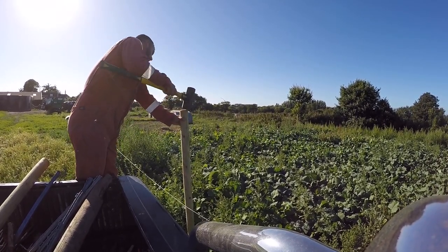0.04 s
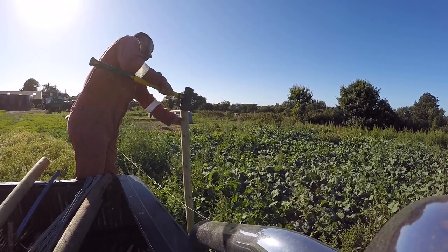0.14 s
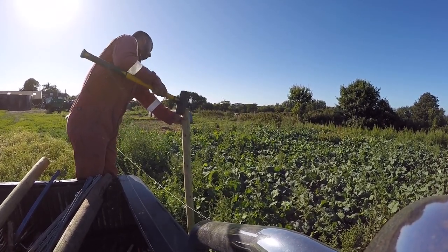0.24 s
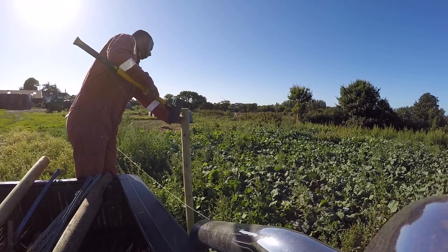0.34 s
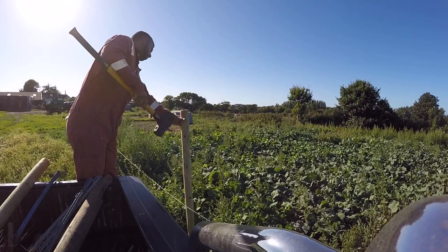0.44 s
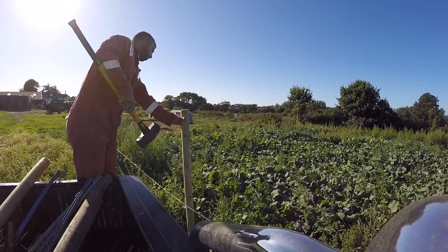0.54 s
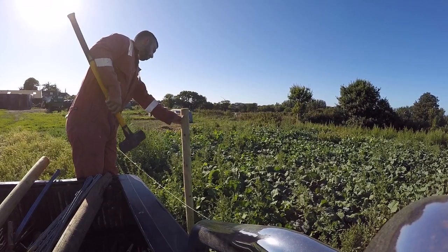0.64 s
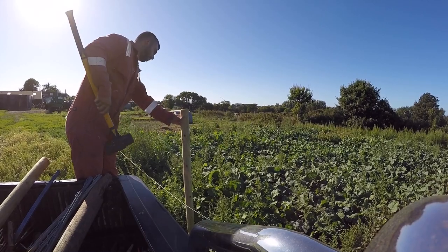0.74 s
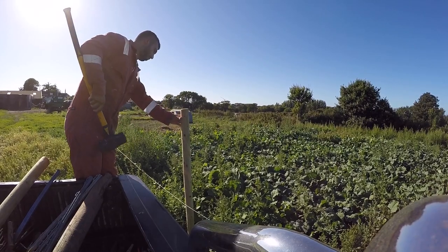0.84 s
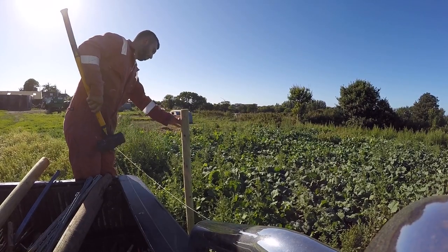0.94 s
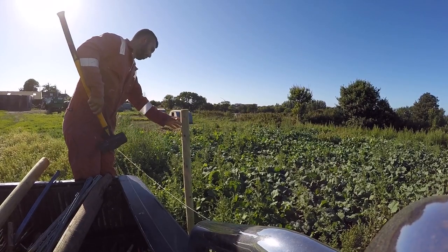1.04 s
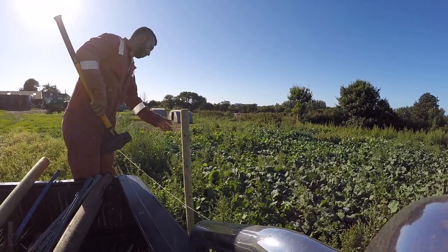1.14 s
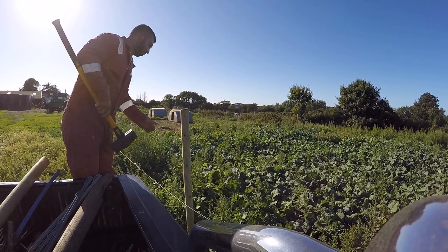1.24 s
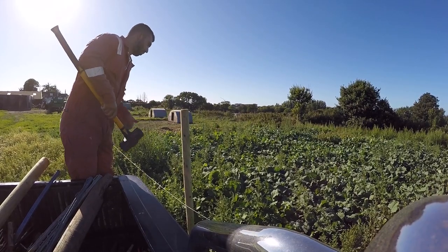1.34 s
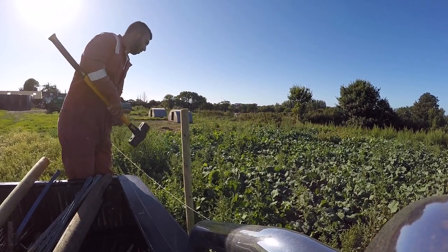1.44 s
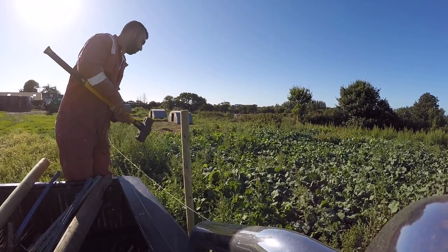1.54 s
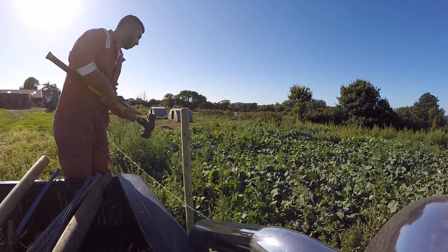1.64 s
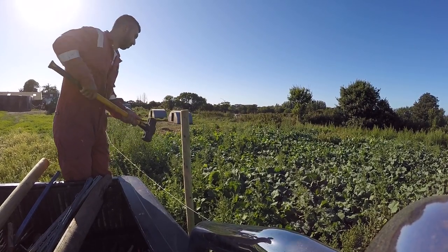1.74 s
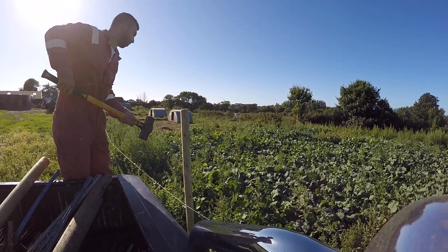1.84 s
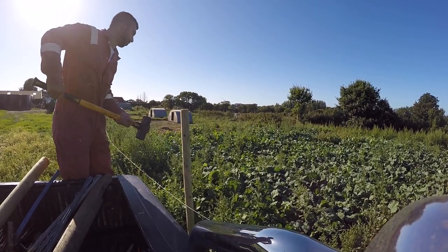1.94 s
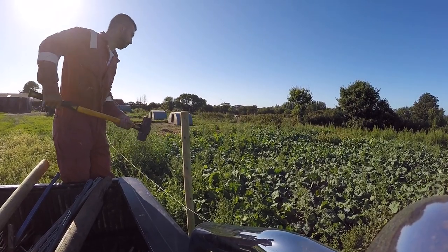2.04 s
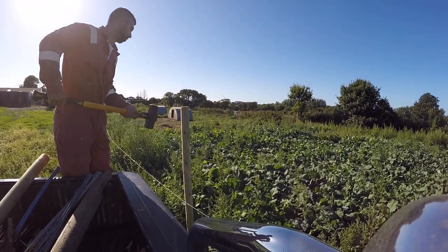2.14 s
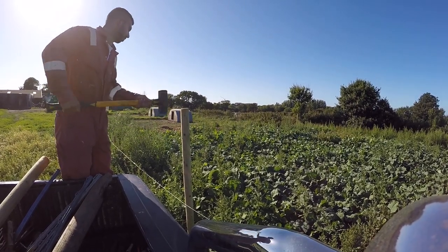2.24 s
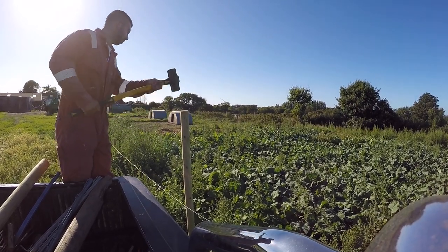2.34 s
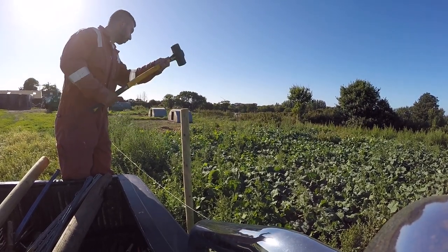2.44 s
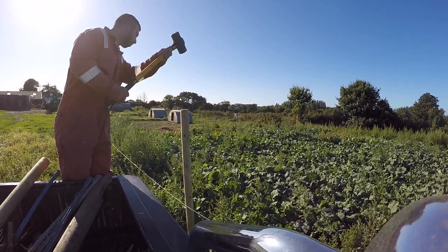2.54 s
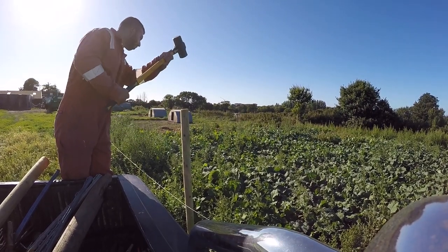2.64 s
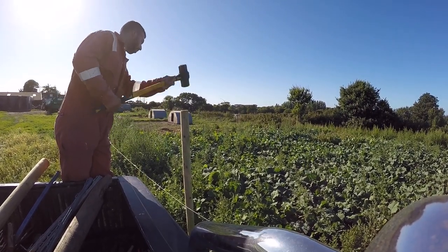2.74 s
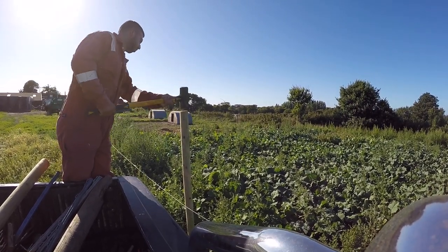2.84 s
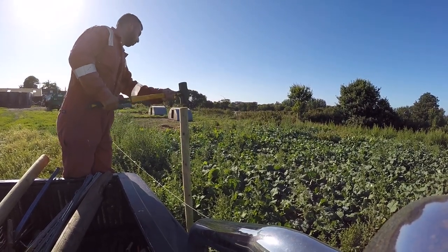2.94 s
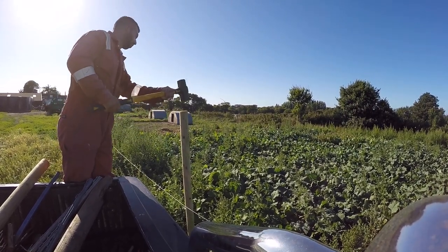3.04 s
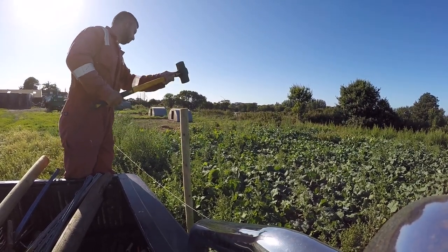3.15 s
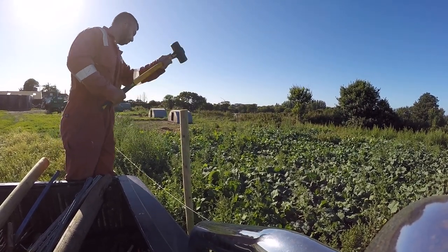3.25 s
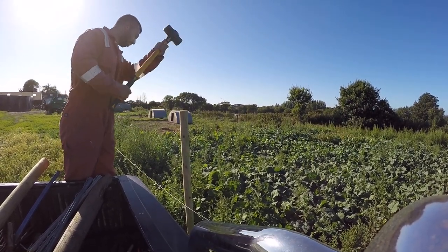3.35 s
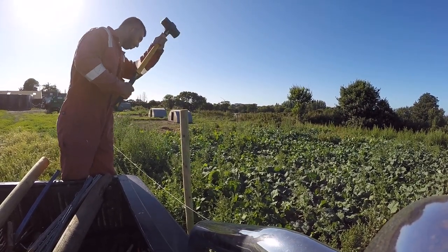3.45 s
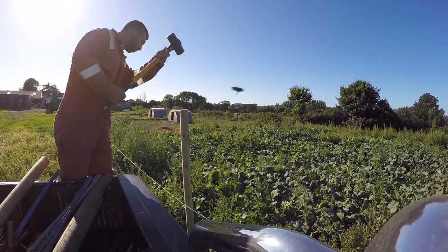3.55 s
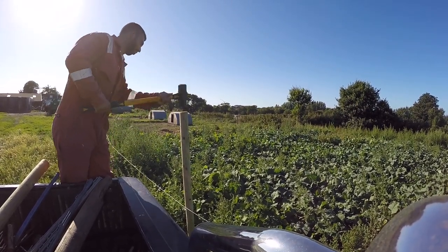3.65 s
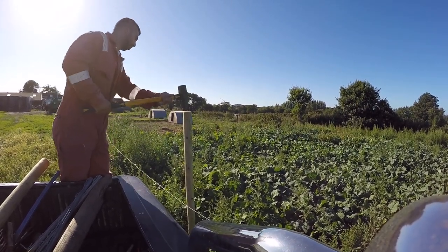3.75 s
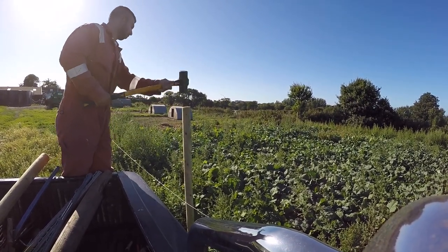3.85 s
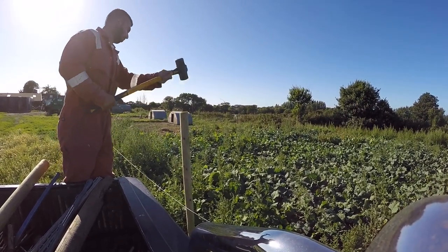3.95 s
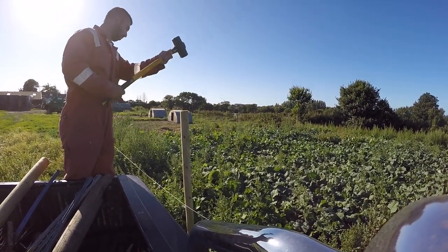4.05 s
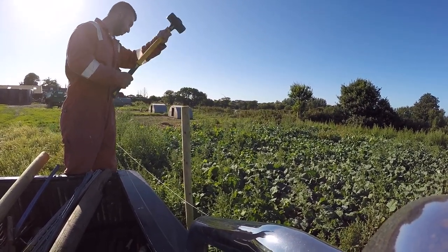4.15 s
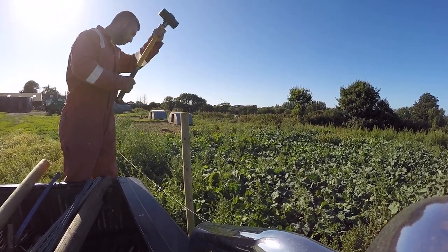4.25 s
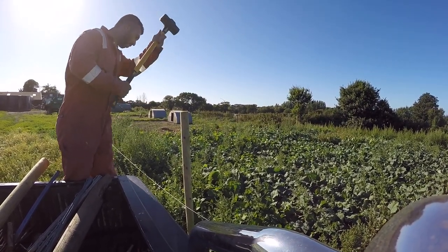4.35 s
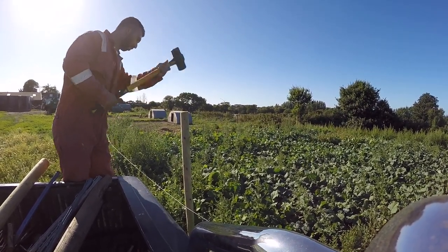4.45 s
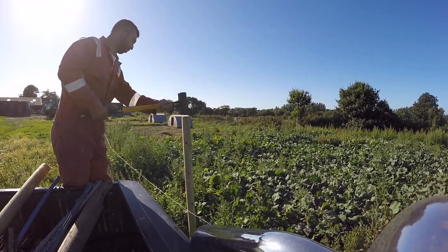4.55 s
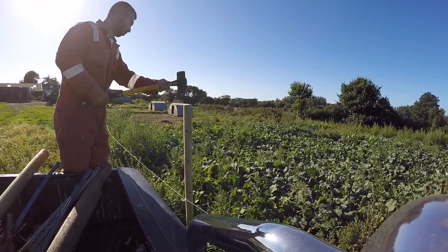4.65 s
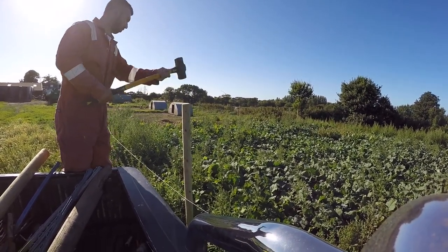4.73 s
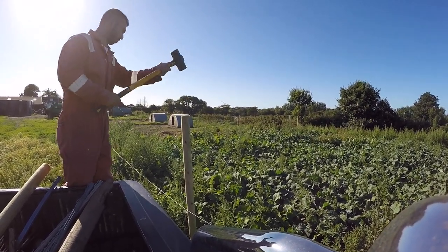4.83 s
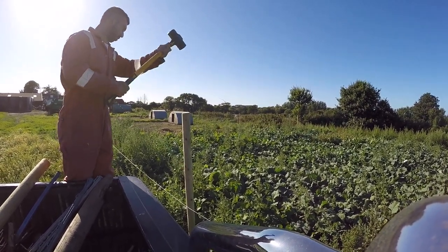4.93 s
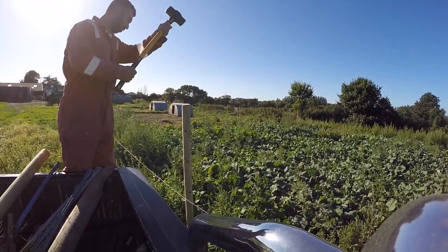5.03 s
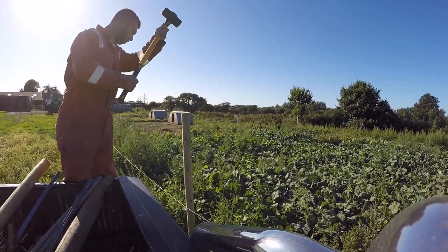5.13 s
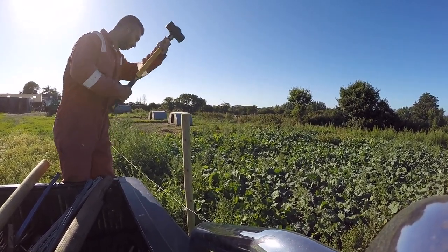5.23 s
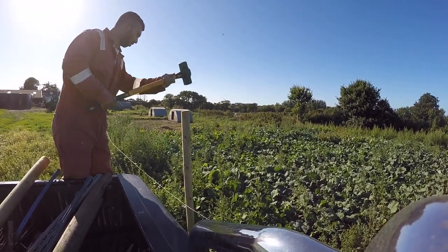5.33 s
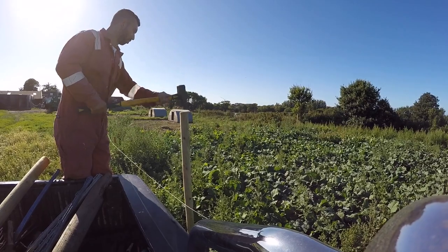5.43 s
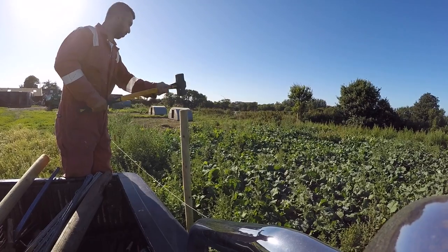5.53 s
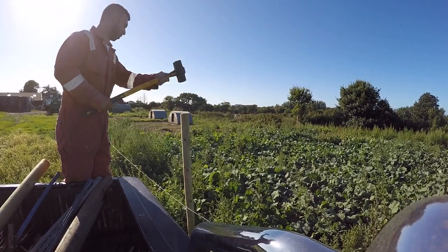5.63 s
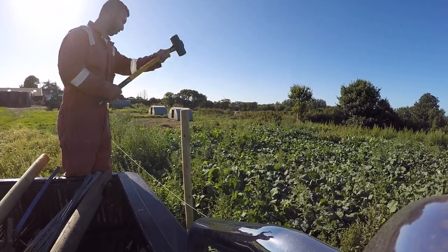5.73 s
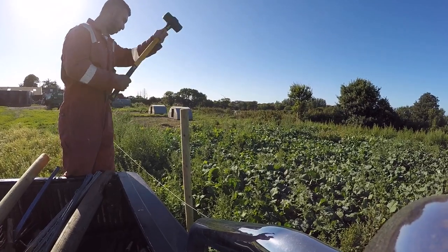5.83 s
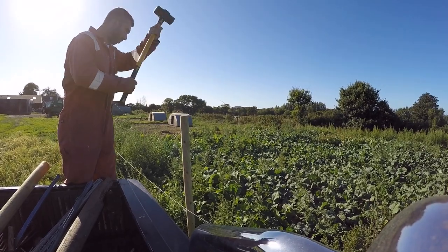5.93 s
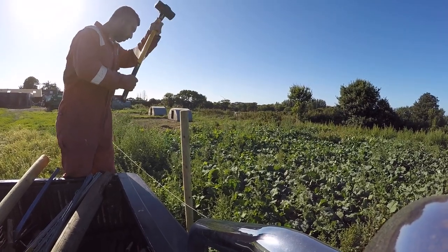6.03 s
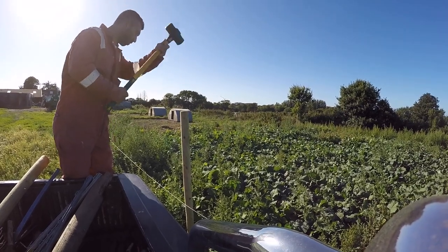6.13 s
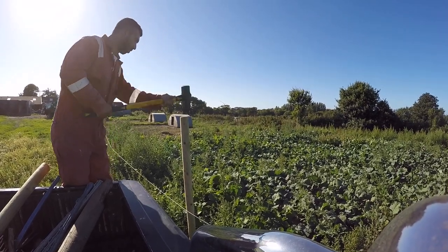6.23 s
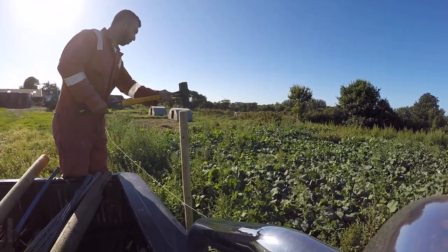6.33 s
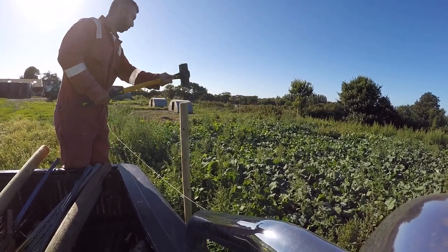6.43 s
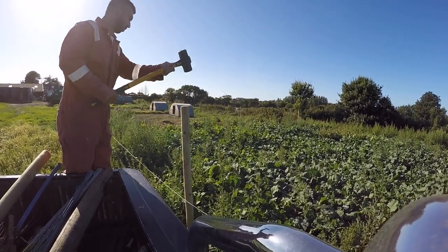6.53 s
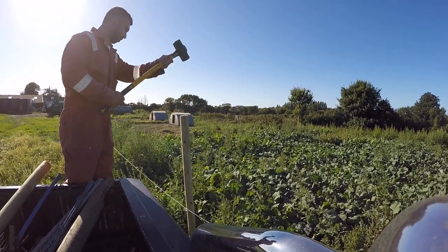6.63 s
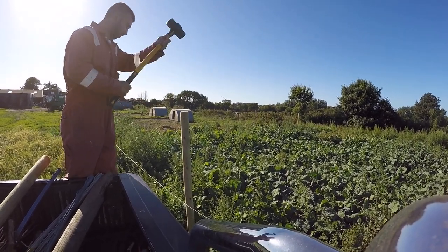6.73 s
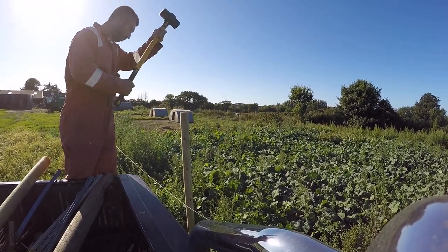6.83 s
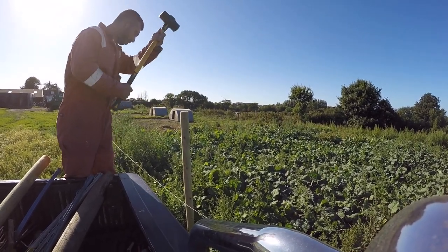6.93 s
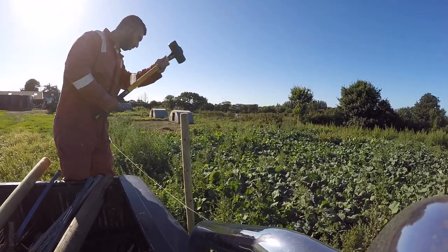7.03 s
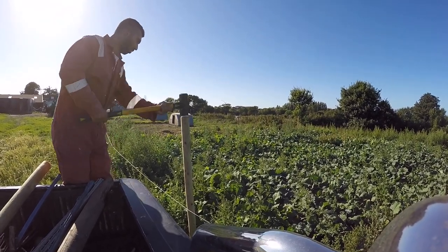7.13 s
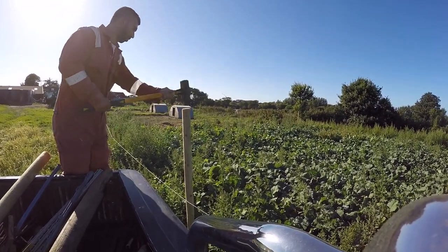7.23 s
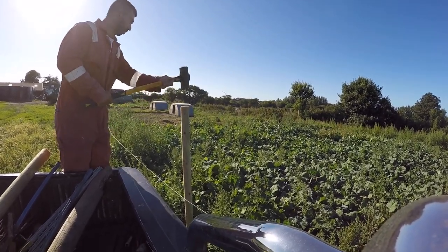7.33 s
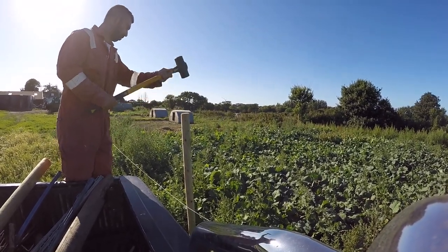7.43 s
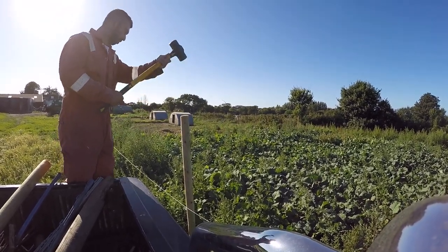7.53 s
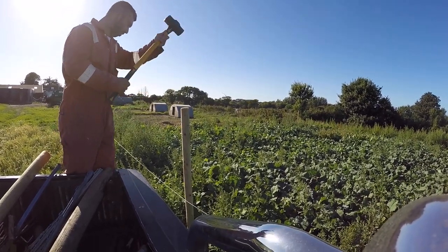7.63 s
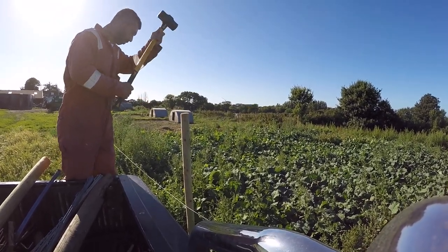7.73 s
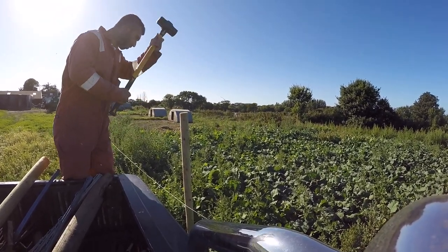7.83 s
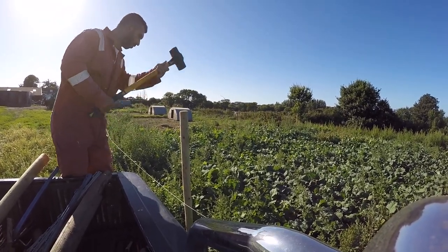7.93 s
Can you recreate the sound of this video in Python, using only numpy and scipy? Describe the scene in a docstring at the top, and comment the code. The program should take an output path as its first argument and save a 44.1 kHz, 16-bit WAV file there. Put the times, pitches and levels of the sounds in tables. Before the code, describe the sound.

Opens on the dying ring of a sledgehammer blow on a wooden post. Nearly three seconds of low engine idle, faint birds, a brief hand slide on the shaft and rising wind follow, then six hard, dry cracks with low soil thumps, a little under a second apart. Loose gear rattles at the end. Open farm field, close microphone overloading slightly on each hit.

```python
"""The dying tail and echoes of one sledgehammer blow on a wooden fence post, then six more, close and overloaded.
Each blow is a noise crack, a ring of decaying sine modes and a low thump of soil; filtered copies and
scattered hiss bring it back from the farmyard. A small engine idles as harmonics over noise, and loose gear
rattles in short noise bursts. Birds call far off in gliding sines, a hand slides on the shaft as shaped
noise, and wind nudges the microphone as low noise that follows breeze and gusts."""
import sys
import numpy as np
from scipy import signal
from scipy.fft import rfft, irfft, next_fast_len
from scipy.io import wavfile

SR = 44100
rng = np.random.default_rng(int(sys.argv[2]) if len(sys.argv) > 2 else 0)


def file_out(sig):
    """Save sig as 16-bit WAV at sys.argv[1]."""
    # one column per channel
    cols = np.atleast_2d(sig).T
    # limit, then scale
    lim = np.clip(cols, -1, 1)
    pcm = np.round(lim * 32767).astype(np.int16)
    wavfile.write(sys.argv[1], SR, pcm)


N = 351914
LEAD_S = 0.2  # the hammer track starts this early, so that a blow before the start can ring on

# dull colour of gear, for knocks and scuffs: (frequency [Hz], relative density [dB per Hz])
KNOCK_COLOUR = [(100, -5), (260, 8.5), (480, -4), (850, 1.5), (1700, -10), (3000, -20), (8000, -39),
                (16000, -69)]


def gain_of(db):
    """Decibels to amplitude."""
    return 10 ** (np.asarray(db) / 20)


def evened(x):
    """Scales to rms 1."""
    return x / np.sqrt(np.mean(x ** 2) + 1e-20)


def read(points, hz):
    """Reads a table on a log-frequency axis."""
    f, value = np.transpose(points)
    return np.interp(np.log(hz + 1), np.log(f + 1), value)


def add(mix, s, sound):
    """Mixes a sound in at time s, cutting whatever runs past the end."""
    part = mix[max(round(s * SR), 0):][:len(sound)]
    part += sound[:len(part)]


def noise(colour, size):
    """Noise of rms 1 with the given spectrum."""
    n = next_fast_len(size)
    hz = np.fft.rfftfreq(n, 1 / SR)
    spectrum = rfft(rng.standard_normal(n)) * gain_of(read(colour, hz))
    return evened(irfft(spectrum, n)[:size])


def drift(hz, size):
    """Slow random wander of rms 1, up to about hz."""
    n = next_fast_len(size)
    lowpass = 1 / (1 + (np.fft.rfftfreq(n, 1 / SR) / hz) ** 4)
    return evened(irfft(rfft(rng.standard_normal(n)) * lowpass, n)[:size])


def fade(t, t60):
    """Exponential decay by 60 dB in t60."""
    return np.exp(-np.log(1000) * t / t60)


def onset(t, delay, rise):
    """A smooth start after a delay."""
    return 1 - np.exp(-(np.maximum(t - delay, 0) / rise) ** 2)


def bloom(t, hz):
    """Low bending waves travel slowly, so the low notes arrive a little later and more softly."""
    lag = 0.003 / (1 + (hz / 550) ** 4)
    return onset(t, lag, 0.0008 + 0.25 * lag)


def burst(colour, t60s, t, count=9):
    """A puff of noise in which every band starts and dies at its own speed."""
    spectrum = rfft(noise(colour, len(t)))
    hz = np.fft.rfftfreq(len(t), 1 / SR)
    centres = np.geomspace(100, 15000, count)
    out = np.zeros(len(t))
    # neighbouring bands crossfade, so their shares add up to the whole spectrum
    for centre, share in zip(centres, np.eye(count)):
        band = irfft(spectrum * read(np.c_[centres, share], hz), len(t))
        out += band * fade(t, read(t60s, centre)) * bloom(t, centre)
    return out


def swell(curve, colour, trim_db=0):
    """Coloured noise that follows a level curve and is all but silent outside it."""
    s, db = np.transpose(curve)
    level_db = np.interp(np.arange(N) / SR, s, db, left=-120, right=-120)
    return gain_of(level_db + trim_db) * noise(colour, N)


def thump(t, hz):
    """The post sinks a moment after the blow and the soil springs back, with one quicker overtone."""
    late = np.maximum(t - 0.007, 0)
    bounce = gain_of(4) * np.sin(2 * np.pi * hz * late) * fade(late, 0.088) * onset(late, 0, 0.006)
    overtone = gain_of(-6.5) * np.sin(2 * np.pi * 142 * (t - 0.003)) * fade(t, 0.074) * onset(t, 0.0014, 0.0042)
    return bounce + overtone


def hammer(size=16384):
    """Each blow crushes the fibres and rings the post; the aim decides which modes speak. Starts LEAD_S early."""
    # blows: (time [s], force on all but the thump [dB], crack brightness [dB], relative thump level [dB],
    # thump pitch [Hz], aim [0 square on the top .. 1 on its edge], extra note [Hz], its relative level [dB])
    blow_list = [(-.052, -2, 6.5, 5.5, 82.9, 0.56, 1320, -18), (2.9316, -2, -2, -5, 81, 0.46, 1678, -1),
                 (3.7915, -1.5, -2.5, -3, 70.3, 0.068, 1778, -5),
                 (4.6502, 0, -4, 2, 69.5, 0.089, 1110, -4.5), (5.5063, 0, 0, -1, 71.4, 1.0, 720, -5.5),
                 (6.381, -0.5, 8.5, 0, 68.3, 1, 1184, -10.5), (7.2533, 0, -5.5, 5, 64.7, 0.12, 676, 1.5)]
    # modes of post and hammer head: (frequency [Hz], relative level struck square [dB],
    # relative level struck on the edge [dB], t60 [s])
    post_modes = [(260, -16, -17, 0.023), (388, -18, -8.5, 0.049), (460, -21.5, -11, 0.049),
                  (665.5, -15, -9, 0.049), (960, -4, -22.5, 0.06), (1021, -13, 3, 0.042),
                  (1298, 3.5, -10.5, .055), (1500, -5, -10, 0.062), (1799, -10.5, -6, 0.052),
                  (1972, -0.5, -16.5, 0.041), (2187, -23.5, -13, 0.05), (2606, -6.5, -17.5, 0.062),
                  (2720, -15.5, -8, 0.046), (2940, -14, -13, 0.06), (3340, -14.5, -14, 0.025),
                  (3584, -17.5, -11, 0.059), (5180, -2.5, -0.5, 0.023)]
    # crushing wood fibres: (frequency [Hz], relative density [dB per Hz])
    crack_colour = [(100, -4.5), (300, 11), (560, 0), (1000, 6.5), (2000, -1), (4200, -5.5), (5400, -8),
                    (7000, -15), (11000, -22.5), (16000, -29.5)]
    # how long the crushing lasts: (frequency [Hz], t60 [s])
    crack_t60 = [(200, 0.084), (1000, 0.054), (3000, 0.049), (6000, 0.055), (14000, 0.032)]
    # steel on wood: (frequency [Hz], relative density [dB per Hz])
    snap_colour = [(1500, -29), (4200, -7.5), (5300, 4.5), (7000, -13.5), (11000, -14.5), (16000, -28.5)]
    bright_above_hz = 5200  # where a blow's brightness takes hold

    t = np.arange(size) / SR
    out = np.zeros(N + round(LEAD_S * SR))
    hz, square_db, edge_db, t60 = np.transpose(post_modes)[:, :, None]
    for s, force_db, bright_db, thump_db, thump_hz, aim, note_hz, note_db in blow_list:
        # random starting phase [turns] and slight detuning of every mode
        phase, detune = rng.uniform(-0.97, 1, (2, len(post_modes), 1))
        height = (1 - aim) * gain_of(square_db) + aim * gain_of(edge_db)
        tones = np.sin(2 * np.pi * (hz * (1 + 0.0034 * detune) * t + phase))
        ring = (height * fade(t, t60) * bloom(t, hz) * tones).sum(0)
        # the head never lands twice on the same spot: each blow brings out one more note
        note = gain_of(note_db) * fade(t, 0.053) * bloom(t, note_hz) * np.sin(2 * np.pi * note_hz * t)
        colour = [(f, db + bright_db / (1 + (bright_above_hz / f) ** 4)) for f, db in crack_colour]
        crack = burst(colour, crack_t60, t)
        # steel meeting wood gives a brief bright snap
        snap = gain_of(-7) * noise(snap_colour, size) * fade(t, 0.014) * onset(t, 0.00018, 0.0002)
        impact = gain_of(-2.5) * (ring + note) + crack + snap
        add(out, LEAD_S + s, gain_of(force_db) * impact)
        add(out, LEAD_S + s, gain_of(thump_db) * thump(t, thump_hz))
    return out


def farmyard(x, size=16384):
    """A flat wall returns a dull slap; leaves scatter the treble into a diffuse hiss that follows its power."""
    # crop and hedges: (delay [s], level against the treble [dB], t60 of the scatter [s])
    hedges = [(0.016, -23, 0.16), (0.074, -33, 0.14), (.112, -39.5, 0.15)]
    # (frequency [Hz], relative density [dB per Hz])
    leaf_colour = [(100, -19.5), (500, 0.5), (1000, 4.5), (2000, 3.5), (3000, 0.5), (4200, -4), (5400, 3),
                   (6500, -5), (8500, -12), (12000, -20), (16000, -31.5)]
    wall_s, wall_db = 0.076, -34.5

    t = np.arange(size) / SR
    slap = np.zeros(len(x))
    dull = signal.sosfilt(signal.butter(2, [700, 1700], "band", fs=SR, output="sos"), x)
    add(slap, wall_s, gain_of(wall_db) * dull)

    response = np.zeros(SR)
    for delay, db, t60 in hedges:
        decay = fade(t, t60) ** 2
        add(response, delay, gain_of(db) ** 2 * decay / decay.sum())
    treble = signal.sosfilt(signal.butter(2, 3000, "high", fs=SR, output="sos"), x)
    power = abs(signal.fftconvolve(treble ** 2, response)[:len(x)])
    return slap + np.sqrt(power) * noise(leaf_colour, len(x))


def engine():
    """Firing orders and shaft tones over a rumble; the airy noise throbs a little with each firing."""
    # firing orders and shaft tones: (multiple of the firing rate, peak level before wavering [dB])
    orders = [(1, -28), (2, -33), (2.78, -43), (3, -41), (4, -34.5), (5, -61.5), (5.55, -47), (7, -58.5),
              (7.76, -50.5), (8, -47.5), (9, -68.5), (10, -56.5), (11, -71), (12, -61), (13, -61),
              (15, -63), (20, -59.5)]
    # airy hiss: (frequency [Hz], relative density [dB per Hz])
    air_colour = [(160, -34.5), (280, -15.5), (366, 1), (398, -3.5), (504, -2), (717, -6), (780, -7.5),
                  (877, -9), (1230, -11.5), (2070, -22), (3250, -24.5), (15500, -44.5)]
    # low rumble: (frequency [Hz], relative density [dB per Hz])
    rumble_colour = [(10, -18.5), (28, -0.5), (80, 5.5), (120, -9.5), (165, -9.5), (200, 0), (230, -10.5),
                     (255, -9), (310, -21), (600, -54.5), (3000, -100)]
    firing_hz = 25.02  # mean rate

    turns = np.cumsum(firing_hz * (1 + 0.003 * drift(2.3, N))) / SR
    hum = np.zeros(N)
    for multiple, db in orders:
        waver = 1 + 0.14 * drift(5.1, N)
        hum += gain_of(db) * waver * np.cos(2 * np.pi * multiple * turns)
    rumble = gain_of(-35) * noise(rumble_colour, N)
    throb = 1 + 0.14 * np.cos(2 * np.pi * turns)
    air = gain_of(-50.5 + 0.5 * drift(6.5, N)) * noise(air_colour, N) * throb
    return hum + rumble + air


def gear(size=12000):
    """Loose things knock together: a short bright tick with a duller, slightly longer body."""
    # knocks: (time [s], relative level of the bright tick [dB], relative level of the dull knock [dB])
    rattles = [(0.096, -46, -33.5), (0.293, -48, -44), (5.853, -48, -39), (6.729, -44, -37.5),
               (7.581, -37, -25.5), (7.611, -26.5, -45), (7.645, -41, -20.5), (7.675, -41, -48),
               (7.714, -56, -34)]
    # (frequency [Hz], relative density [dB per Hz])
    tick_colour = [(500, -20), (1500, 5), (4200, 7.5), (6000, -1), (9000, -13), (15000, -30)]

    t = np.arange(size) / SR
    out = np.zeros(N)
    for s, tick_db, knock_db in rattles:
        tick = gain_of(tick_db - 2.5) * noise(tick_colour, size) * fade(t, 0.043)
        knock = gain_of(knock_db - 2) * noise(KNOCK_COLOUR, size) * fade(t, 0.048)
        add(out, s, (tick + knock) * onset(t, 0, 0.001))
    return out


def bird_note(length, glide, hoarse, size=16384):
    """One note that swells and fades; glide gives its pitch from start (0) to end (1), hoarse its roughness."""
    u = np.minimum(np.arange(size) / SR / length, 1)
    hz = glide(u) * (1 + hoarse * drift(380, size))
    return np.sin(np.pi * u) * np.sin(2 * np.pi * np.cumsum(hz) / SR)


def birds(size=16384, pip_count=4):
    """Whistles, squawks, pips and chirps, with a flock twittering at random behind them, blurred by distance."""
    # clear whistles that glide and level off:
    # (time [s], length [s], start pitch [Hz], end pitch [Hz], relative level [dB])
    whistles = [(2.66, .11, 1900, 2020, -61.5), (3.112, .22, 2750, 2230, -58.5),
                (3.441, .12, 1965, 2080, -60), (4.072, 0.074, 2380, 2520, -57.5),
                (5.16, .15, 2250, 2318, -65.5)]
    # hoarse falling calls: (time [s], length [s], start pitch [Hz], relative level [dB])
    squawks = [(0.317, 0.062, 3120, -57), (2.285, .11, 4760, -59), (2.336, .065, 3580, -49),
               (4.165, .035, 3440, -57.5), (5.267, 0.13, 5300, -63), (5.878, .18, 2830, -62.5)]
    # quick rising chirps of the nearer small birds: (time [s], start pitch [Hz], relative level [dB])
    chirps = [(1.485, 3750, -64), (3.277, 3550, -63), (3.51, 4200, -59), (5.978, 4000, -63),
              (6.204, 4250, -61.5), (6.333, 4600, -60), (6.548, 3970, -58), (6.785, 4880, -62),
              (7.88, 4600, -58)]
    # one bird repeats a thin, slightly falling pip at an even pace, louder each time
    pip_from_s, pip_every_s, pip_s, pip_hz = 4.055, 0.138, 0.024, 6000
    pip_db, pip_grows_db = -67.5, 1.2
    # the rest of the flock, farther off: start, rate, middle pitch and its spread as a share, relative level
    flock_from_s, twitter_per_s, twitter_hz, twitter_spread, twitter_db = 5.3, 6, 4100, 0.22, -69

    t = np.arange(size) / SR
    out = np.zeros(N)
    for s, length, start_hz, end_hz, db in whistles:
        # a bend of 1 would be a straight glide
        note = bird_note(length, lambda u: end_hz + (start_hz - end_hz) * (1 - u) ** 1.3, hoarse=0.013)
        add(out, s, gain_of(db) * note)
    for s, length, hz, db in squawks:
        note = bird_note(length, lambda u: hz * (1 - 0.29 * u), hoarse=0.06)
        add(out, s, gain_of(db) * note)
    for k in range(pip_count):
        note = bird_note(pip_s, lambda u: pip_hz * (1 - 0.04 * u), hoarse=0)
        add(out, pip_from_s + k * pip_every_s, gain_of(pip_db + k * pip_grows_db) * note)

    span = N / SR - flock_from_s
    flock = []
    for when, high in rng.random((round(twitter_per_s * span), 2)):
        hz = twitter_hz * (1 + twitter_spread * (2 * high - 1))
        flock.append((flock_from_s + span * when, hz, twitter_db))
    for s, hz, db in list(chirps) + flock:
        note = bird_note(0.038, lambda u: hz * (1 + 0.34 * u ** 2), hoarse=0.02)
        add(out, s, gain_of(db) * note)

    scatter = rng.standard_normal(size) * fade(t, 0.25)
    blurred = signal.fftconvolve(out, scatter / np.linalg.norm(scatter))[:N]
    return gain_of(2.1) * out + gain_of(-5.5) * blurred


def hand():
    """A hand slides along the shaft: bright friction noise that swells and dies."""
    # (time [s], level [dB])
    slide = [(1.6, -70.5), (1.744, -56), (1.776, -65), (1.854, -58.5), (1.908, -61), (2.004, -65.5),
             (2.026, -75), (2.08, -80)]
    # (frequency [Hz], relative density [dB per Hz])
    slide_colour = [(800, -10.5), (2500, 4.5), (5000, 1.5), (8000, -0.5), (11500, -3), (15000, -4.5)]
    return swell(slide, slide_colour)


def wind(size=4096):
    """A fluttering breeze and gusts buffet the microphone; strong ones break into quick, higher eddies and slaps."""
    # the breeze rises and eases: (time [s], relative level [dB])
    breeze_curve = [(2.05, -47), (2.3, -35), (3.1, -27), (4, -40), (4.7, -27), (5.05, -38.5), (5.4, -29.5),
                    (6.6, -32), (7.6, -45.5)]
    # gusts that swell and sink on top of it: (time of the peak [s], half length [s], relative level [dB])
    gust_list = [(3.3, .09, -19.5), (3.65, 0.043, -24.5), (4.26, 0.034, -23), (4.53, 0.064, -18.5),
                 (6.03, .06, -23), (7.952, 0.069, -26)]
    # single slaps of wind on the microphone: (time [s], level before the envelope [dB])
    slaps = [(2.391, -17.5), (3.22, -12.5), (3.282, -16), (3.318, -17.5), (3.349, -13.5)]
    # low buffeting: (frequency [Hz], relative density [dB per Hz])
    wind_colour = [(10, -10.5), (30, 6.5), (75, 3.5), (120, -11.5), (250, -29), (600, -73), (3000, -110)]
    # eddies and slaps: (frequency [Hz], relative density [dB per Hz])
    eddy_colour = [(40, -12.5), (130, 4), (250, -8.5), (380, -21), (900, -54), (3000, -100)]

    now = np.arange(N) / SR
    flutter_db = 3 * drift(4, N)
    breeze = gain_of(np.interp(now, *np.transpose(breeze_curve), left=-90) + flutter_db)
    gusts = sum(gain_of(db) * np.exp(-((now - s) / half) ** 2) for s, half, db in gust_list)
    level_db = 20 * np.log10(np.hypot(breeze, gusts))
    out = gain_of(level_db + 1.3) * noise(wind_colour, N)
    # eddies grow 1.5 dB for each dB of wind
    eddy_db = -33 + 1.5 * (level_db + 18.5) + 2.4 * drift(25, N)
    out += gain_of(eddy_db) * noise(eddy_colour, N)

    t = np.arange(size) / SR
    for s, db in slaps:
        add(out, s, gain_of(db) * noise(eddy_colour, size) * fade(t, 0.074) * onset(t, 0, 0.0056))
    return out


def scuff():
    """Gear scrapes as it shifts: dull noise whose level flickers quickly."""
    # (time [s], relative level [dB])
    scrape = [(7.57, -63), (7.582, -31.5), (7.642, -33.5), (7.648, -27.5), (7.676, -34.5), (7.74, -59)]
    return swell(scrape, KNOCK_COLOUR, trim_db=-3.5) * gain_of(2 * drift(150, N))


def scene():
    """Blows and their echoes over engine, gear, birds, handling and wind."""
    blows = hammer()
    strikes = (blows + farmyard(blows))[-N:]  # drops the lead-in
    return (strikes + engine() + gear() + birds() + hand() + wind() + scuff())[None]


def record(dry):
    """The blows overload the input; gain control dips after each and creeps back; then the band limit."""
    loaded = dry / (1 + (abs(dry) / 0.97) ** 5) ** (1 / 5)  # peaks bend over towards 0.97
    # running power, smoothed over about 200 samples
    power = signal.lfilter([1 / 200], [1, 1 / 200 - 1], loaded[0] ** 2)
    power_db = 10 * np.log10(power + 1e-12)
    # half of what exceeds -14.5 dB is cut; the cut then recovers 9 dB a second
    wanted_cut_db = 0.5 * np.maximum(power_db + 14.5, 0)
    recovery = np.arange(N) / SR * 9
    cut_db = np.maximum.accumulate(wanted_cut_db + recovery) - recovery
    lag = np.exp(-1 / (0.055 * SR))  # the gain follows with a time constant of 55 ms
    ducked = loaded * gain_of(-signal.lfilter([1 - lag], [1, -lag], cut_db))
    edge_hz = 15500
    lowpass = signal.firwin(255, edge_hz, window=("kaiser", 8), fs=SR)
    return signal.oaconvolve(ducked, lowpass[None], "same")


dry = scene()
out = record(dry)
file_out(out)
```